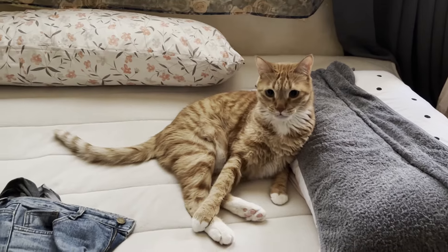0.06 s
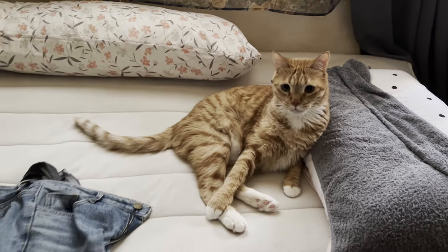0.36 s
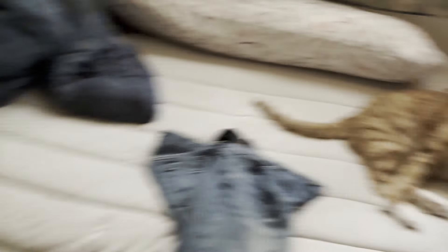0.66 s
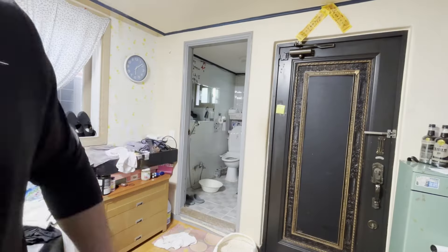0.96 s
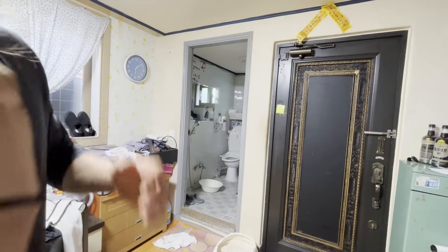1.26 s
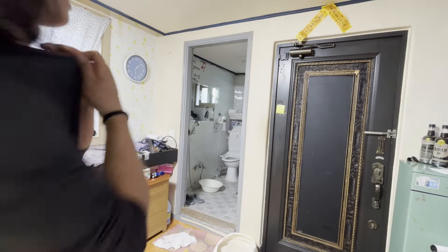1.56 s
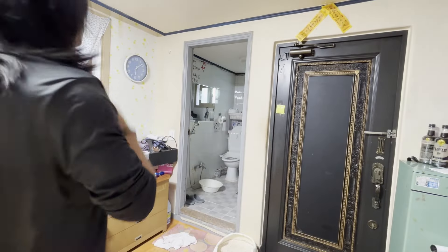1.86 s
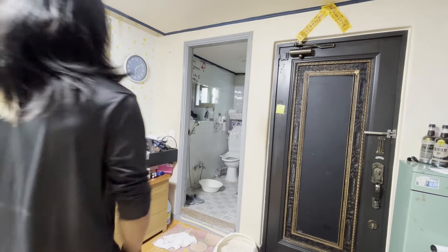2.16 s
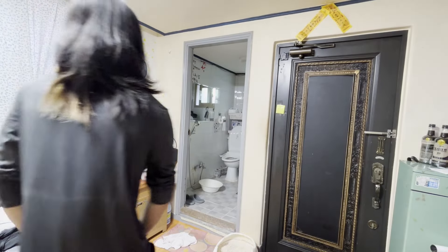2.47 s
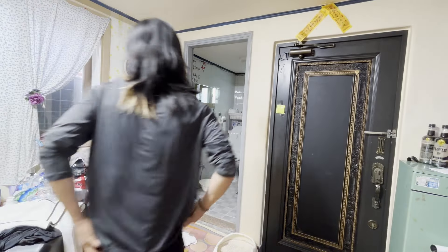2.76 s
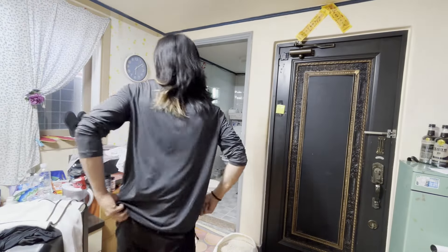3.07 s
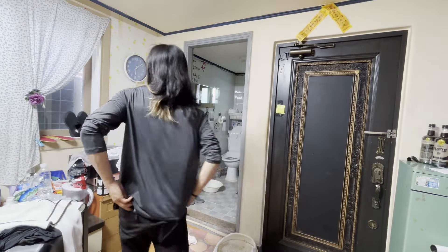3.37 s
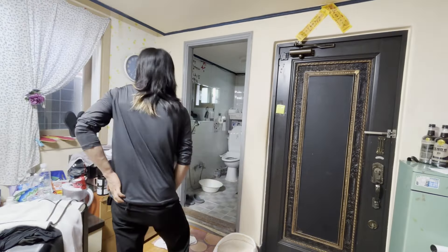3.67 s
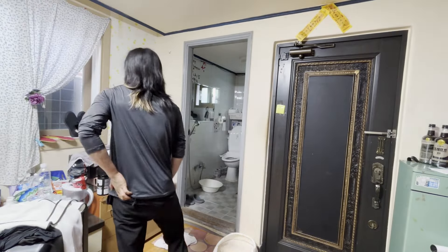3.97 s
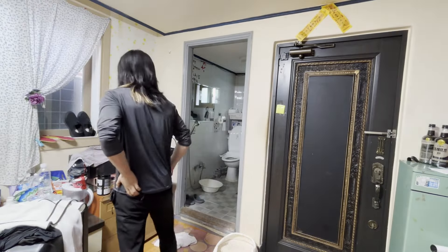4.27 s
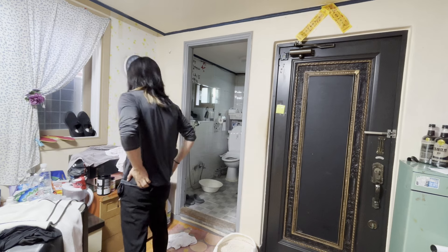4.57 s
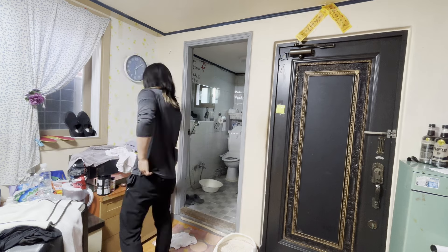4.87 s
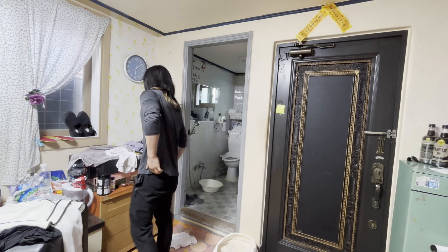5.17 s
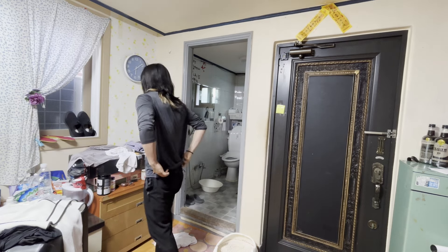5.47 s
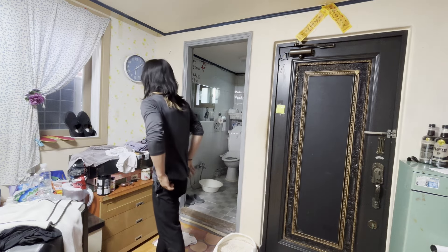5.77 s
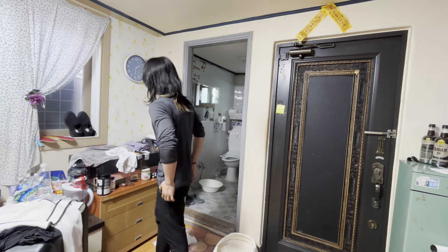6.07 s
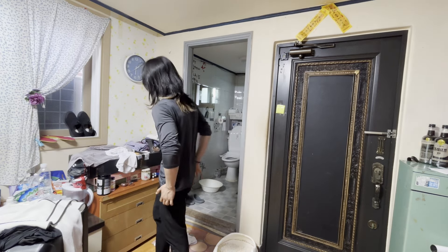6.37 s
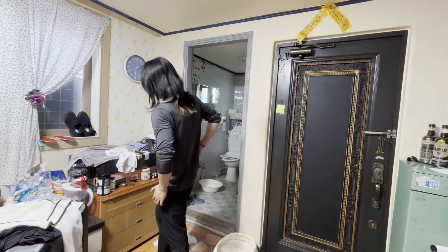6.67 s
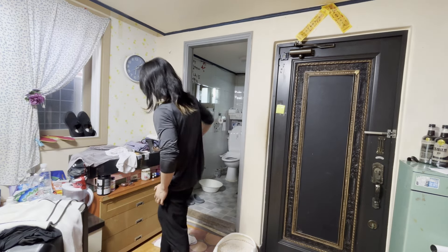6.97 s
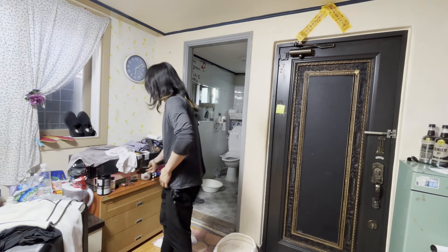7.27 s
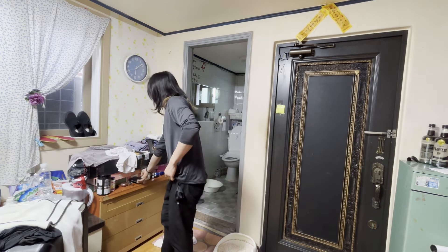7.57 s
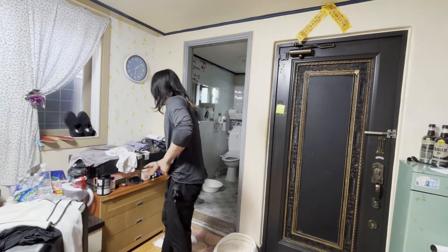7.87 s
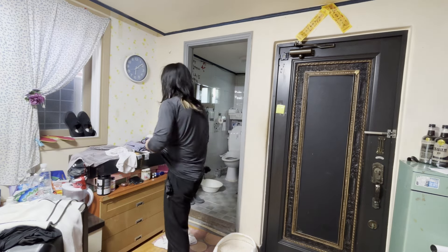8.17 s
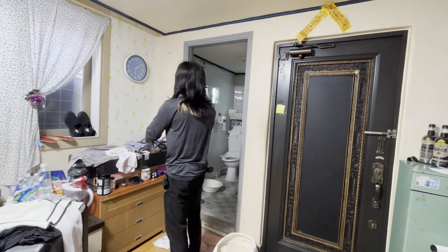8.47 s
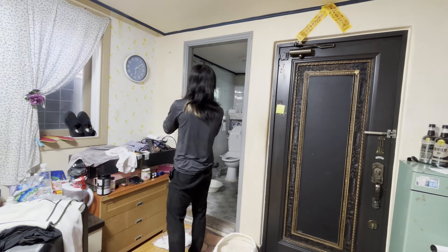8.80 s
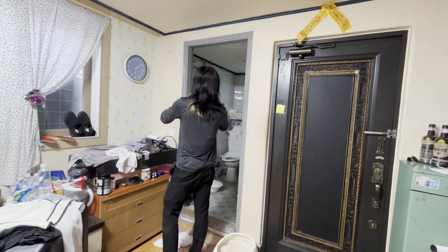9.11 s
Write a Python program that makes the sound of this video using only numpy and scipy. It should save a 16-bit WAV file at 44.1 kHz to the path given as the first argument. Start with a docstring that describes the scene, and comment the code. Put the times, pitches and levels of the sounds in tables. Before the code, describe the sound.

Sheets rustle briefly, followed by a small knock and a sharp, close click. Soft, dull footsteps cross a quiet small room as hands pat and pull at clothing and keys jingle lightly. About halfway through, objects land on a wooden dresser with a loud clatter, a hollow boom and bright ringing keys. The fabric keeps swishing, another thump and jingle come from the dresser, and lighter knocks trail off over a faint hum.

```python
"""Bedding rustles over faint room air and hum as someone leaves a bed; a knock, finger taps on a case.
Soft steps cross the small room while hands pat and tug a loose shirt and hitch up trousers:
cloth rubs, hisses and crackles. Keys at the belt jingle in thin metal partials, and small objects
clatter onto a wooden dresser, whose top and drawers ring while its hollow body booms."""
import sys
import numpy as np
from scipy import signal
from scipy.io import wavfile

SR = 44100
rng = np.random.default_rng(int(sys.argv[2]) if len(sys.argv) > 2 else 0)


def inscribe(sig):
    """Save sig as 16-bit PCM at rate SR to the path in sys.argv[1].

    A 1-D sig is mono; a 2-D sig holds one channel per row.
    Samples are clipped to [-1, 1] before scaling.
    """
    pcm = np.round(np.clip(np.atleast_2d(sig).T, -1, 1) * 32767)
    wavfile.write(sys.argv[1], SR, pcm.astype(np.int16))


N = 403074
TIME_S = np.arange(N) / SR
EDGES_HZ = np.geomspace(25, 16000, 25)
CENTRES_HZ = np.sqrt(EDGES_HZ[1:] * EDGES_HZ[:-1])


def from_db(db):
    """Decibels to gain."""
    return 10 ** (np.asarray(db) / 20)


def rms_one(x):
    """Scale to unit power."""
    return x / np.sqrt(np.mean(np.abs(x) ** 2) + 1e-20)


def in_time(points):
    """Read a time curve at every sample."""
    return np.interp(TIME_S, *np.transpose(points))


def at_hz(points, hz):
    """Read a curve on a log-frequency axis."""
    knots_hz, values = np.transpose(points)
    return np.interp(np.log(hz), np.log(knots_hz), values)


def butter(x, order, hz, kind):
    """Butterworth filter."""
    return signal.sosfilt(signal.butter(order, hz, kind, fs=SR, output="sos"), x)


def pan(left_right_db):
    """Constant-power left and right gains."""
    return rms_one(from_db([[left_right_db / 2], [-left_right_db / 2]]))


def drift(rate_hz):
    """Smooth random wander of unit power."""
    hop, warmup = 40, 2000
    pole = np.exp(-2 * np.pi * hop * rate_hz / SR)
    white = rng.standard_normal(N // hop + warmup + 2)
    slow = signal.lfilter([1], [1, -2 * pole, pole * pole], white)[warmup:]
    return np.interp(np.arange(N) / hop, np.arange(len(slow)), rms_one(slow))


def burst(onset_s, contact_s, t60_s):
    """Span and envelope of a blow: builds during contact, then decays."""
    start = int(onset_s * SR)
    t = TIME_S[:min(int((t60_s + contact_s) * SR), N - start)]
    attack = np.minimum(t / contact_s, 1) ** 2
    decay = from_db(-60 * np.maximum(t - contact_s, 0) / t60_s)
    return slice(start, start + len(t)), attack * decay


# Stereo balance: (frequency [Hz], left-right [dB])
BALANCE = [(60, -2.5), (200, -1), (380, 1), (700, 1), (1300, 3.5), (2400, 3.5), (4400, 6), (8100, 1.5),
           (15000, -3)]

def noise_bands(coherence):
    """Unit-power stereo noise bands with the given likeness between the ears."""
    white, bands = rng.standard_normal((2, 2, N)), []
    for k, hz in enumerate(CENTRES_HZ):
        mid, side = butter(white[k % 2], 2, EDGES_HZ[k:k + 2], "band")
        alike = at_hz(coherence, hz)
        mid, side = np.sqrt(1 + alike) * mid, np.sqrt(1 - alike) * side
        stereo = rms_one(np.array([mid + side, mid - side]))
        bands.append((stereo * pan(at_hz(BALANCE, hz))).astype(np.float32))
    return np.array(bands)


def mix(bands, gains):
    """Weighted sum of bands."""
    return np.einsum("b,bcn->cn", gains.astype(np.float32), bands)


def coloured(bands, spectrum):
    """Unit-power noise shaped by (frequency [Hz], density [dB])."""
    return rms_one(mix(bands, from_db(at_hz(spectrum, CENTRES_HZ)) * np.sqrt(CENTRES_HZ)))


def patchy(bands, spectrum, spread_db, rate_hz):
    """Unit-power noise of shifting colour: bands swell and fade in pairs."""
    gains = from_db(at_hz(spectrum, CENTRES_HZ)) * np.sqrt(CENTRES_HZ)
    pairs = (mix(bands[k:k + 2], gains[k:k + 2]) for k in range(0, len(bands), 2))
    return rms_one(sum(pair * from_db(spread_db * drift(rate_hz)) for pair in pairs))


# Room air: (frequency [Hz], density [dB])
AIR_SPECTRUM = [(15, -31), (25, 4), (150, 2), (373, -4.5), (529, -13), (604, 1), (790, -15), (1350, -14),
                (3830, -31), (8780, -22.5), (11200, -32.5), (13100, -20.5), (15000, -39.5)]
# Air, hum and whine: (time [s], level [dB])
AIR_LEVEL = [(0, -77.5), (.25, -75), (.45, -73.5), (.95, -65.5), (1.05, -66), (5, -63), (7.1, -64.5),
             (9.14, -62.5)]
HUM_LEVEL = [(0, -93), (1.15, -77), (1.35, -66.5), (2.1, -71), (2.45, -76), (9.14, -85)]
WHINE_LEVEL = [(0, -88), (.92, -84), (.97, -110)]

def room_tone(bands, hum_hz=61, whine_hz=3750):
    """Still air, a low hum and, for the first second, a faint whine."""
    hum = from_db(in_time(HUM_LEVEL)) * np.sqrt(2) * np.sin(2 * np.pi * hum_hz * TIME_S)
    whine = from_db(in_time(WHINE_LEVEL)) * np.sqrt(2) * np.sin(2 * np.pi * whine_hz * TIME_S)
    air = from_db(in_time(AIR_LEVEL)) * coloured(bands, AIR_SPECTRUM)
    return air + hum + whine * drift(50)


# Brushed bedding: (time [s], level [dB])
BEDDING_LEVEL = [(0, -82), (.37, -73.5), (.46, -65), (.55, -63.5), (.62, -67.5), (.94, -69), (.98, -74)]
# Colour of the brushing noise as heard, with a deep gap near 7.5 kHz: (frequency [Hz], density [dB])
BRUSH_SPECTRUM = [(180, -32.5), (300, -10.5), (1110, -9), (1350, -6.5), (2830, -5), (5130, -9),
                  (7500, -33.5), (10600, -16.5), (15500, -15.5)]

def bedding(bands, grain_db=2.0):
    """A soft, grainy brush over the sheets."""
    return from_db(in_time(BEDDING_LEVEL) + grain_db * drift(300)) * coloured(bands, BRUSH_SPECTRUM)


def bed_knock(bands, onset_s=0.7065, level_db=-55):
    """A small hollow knock some way off."""
    hollow = coloured(bands, [(300, -13), (950, 3), (1400, -3), (2500, -37), (8000, -25)])
    span, envelope = burst(onset_s, contact_s=0.001, t60_s=0.18)
    out = np.zeros((2, N))
    out[:, span] = from_db(level_db) * envelope * hollow[:, span]
    return out


# Fingers on a small case: (time [s], level [dB])
TAPS = [(0.709, -56), (0.846, -37), (0.8546, -24.5), (0.8578, -40)]
# Case modes: (frequency [Hz])
CASE_HZ = [700, 1050, 1600, 3300]
# Per mode: (level [dB], t60 [s])
CASE_MODES = [(-18, 0.021), (-5, 0.0073), (-9, 0.0064), (-29, .003)]

def case_taps(bands, right_lag_s=0.0001, left_right_db=2, nail_db=-23):
    """A nail snaps on the case; its modes ring a few cycles, reaching the left first."""
    out, t = np.zeros((2, N)), TIME_S[:SR // 20]
    ring = sum(from_db(db - 60 * t / t60_s) * np.sin(2 * np.pi * hz * t)
               for hz, (db, t60_s) in zip(CASE_HZ, CASE_MODES))
    ring = butter(ring, 3, 500, "high")   # too small a body for bass
    nail = coloured(bands, [(2000, -7), (4300, 0), (7000, -37)])
    for onset_s, db in TAPS:
        span, envelope = burst(onset_s, contact_s=0.00061, t60_s=0.0091)
        out[:, span] += from_db(db + nail_db) * envelope * nail[:, span]
        for ear, gain in enumerate(pan(left_right_db)):
            start = int((onset_s + ear * right_lag_s) * SR)
            out[ear, start:start + len(t)] += gain * from_db(db) * ring
    return out


# Footfalls: (time [s], boom [dB], thump [dB])
STEPS = [(0.86, -53, -73), (1.047, -47, -51), (3.001, -53.5, -69), (3.33, -55, -56), (4.488, -49.5, -57.5),
         (5.495, -49, -97), (6.15, -46, -74), (7.36, -71, -49.5), (7.602, -61.5, -68), (7.795, -58, -62)]

def footsteps(bands, gain_db=-1, sole_lag_s=0.069, sole_db=-8.5):
    """Soft weight on the floor, heel then sole: a boom with a dull thump above it."""
    boom = coloured(bands, [(25, -17), (42, 23), (85, 7.5), (140, -30.5), (400, -71), (2000, -80)])
    thump = coloured(bands, [(60, -9), (130, 0), (270, -0.5), (450, -17.5), (2000, -30), (8000, -80)])
    out = np.zeros((2, N))
    for onset_s, boom_db, thump_db in STEPS:
        for lag_s, part_db in [(0, 0), (sole_lag_s, sole_db)]:
            span, envelope = burst(onset_s + lag_s, contact_s=0.0081, t60_s=0.26)
            floor = from_db(boom_db) * boom[:, span] + from_db(thump_db) * thump[:, span]
            out[:, span] += from_db(part_db) * envelope * floor
    return from_db(gain_db) * out


# Cloth on cloth: (peak time [s], rub [dB], hiss lift [dB], rise [s], fall [s])
STROKES = [(1.2, -68, 5, 0.17, 0.22), (1.4, -64, 1.5, 0.027, 0.48), (1.765, -59, 9, 0.12, 0.1),
           (1.86, -62, 2.5, 0.089, 0.21), (2.331, -49, 1, 0.051, 0.063), (2.58, -50, 3, 0.16, 0.25),
           (2.689, -45, 4, 0.081, .09), (2.859, -50.5, 3.5, 0.09, 0.15), (3.39, -53, 2, 0.35, 0.077),
           (3.584, -49.5, 4.5, 0.3, 0.14), (3.869, -52, 0.5, 0.045, 0.055), (4.3, -56, 2, 0.65, 0.63),
           (4.788, -61.5, 5, .11, 0.24), (5.52, -57.5, 1, 0.45, 0.13), (5.81, -54, 0, 0.17, 0.2),
           (6.02, -63.5, 1, 0.13, 0.26), (6.5, -57, 1.5, 0.18, 0.34), (6.76, -60, -0.5, 0.18, 0.14),
           (7.3, -66.5, 6.5, .11, 0.36), (8.115, -56.5, 4.5, 0.21, 0.23), (8.42, -64.5, 2.5, 0.21, 0.33),
           (8.95, -66.5, 4, 0.9, 0.45)]

def stroke_swells(edge_db=-13, roundness=1.44):
    """Rub and hiss envelopes: each stroke swells and fades with hand speed."""
    rub_power, hiss_power = np.zeros((2, N))
    for peak_s, db, hiss_db, rise_s, fall_s in STROKES:
        span = slice(max(int((peak_s - 3 * rise_s) * SR), 0), int((peak_s + 3 * fall_s) * SR))
        t = TIME_S[span] - peak_s
        away = np.maximum(-t / rise_s, t / fall_s)
        power = from_db(db + edge_db * away ** roundness) ** 2
        rub_power[span] += power
        hiss_power[span] += power * from_db(hiss_db) ** 2
    return np.sqrt(rub_power), np.sqrt(hiss_power)


def thread_crackle(snaps_per_s=790, spread_db=4.5, level_db=-15):
    """Threads snap free: tiny bright clicks of uneven size, different in each ear."""
    sizes = from_db(spread_db * np.minimum(rng.exponential(1, (2, N)), 4))
    signs = rng.choice([-1, 1], (2, N))
    snaps = sizes * signs * (rng.random((2, N)) < snaps_per_s / SR) + 1e-18
    return from_db(level_db) * rms_one(butter(snaps, 2, [11500, 14300], "band"))


# Sliding fabric: (frequency [Hz], density [dB])
RUB_SPECTRUM = [(88, -29), (150, -4), (192, -17.5), (227, -1.5), (398, -2), (509, -8.5), (626, 2),
                (813, 0.5), (1570, 1), (4000, -7.5), (5200, -32.5), (8800, -120)]
HISS_SPECTRUM = [(1650, -36), (2800, -10), (3500, -9.5), (4460, 4), (7410, 0.5), (9660, 7.5), (11000, -7.5),
                 (13000, -11), (14500, -14), (15500, -31)]

def cloth_strokes(bands, fold_db=1.23, grain_db=1.0, hiss_db=-5):
    """Fabric slides in uneven folds of shifting colour; catching threads roughen the hiss."""
    rub_swell, hiss_swell = stroke_swells()
    folds_db = fold_db * drift(17)
    rub = patchy(bands, RUB_SPECTRUM, spread_db=1.7, rate_hz=12)
    rub *= from_db(folds_db + grain_db * drift(120))
    hiss = from_db(folds_db + hiss_db + grain_db * drift(500)) * coloured(bands, HISS_SPECTRUM)
    return rub_swell * rub + hiss_swell * (hiss + thread_crackle())


# Wall and furniture echoes: (left delay [s], right delay [s], level [dB])
ECHOES = [(.0019, .0021, -18.5), (.0043, .0038, -14), (.0071, .0076, -14)]

def near_walls(dry):
    """Early echoes colour the sound at about the same power."""
    out, power = dry.copy(), 1
    for *delays_s, db in ECHOES:
        power += from_db(db) ** 2
        for ear, delay_s in enumerate(delays_s):
            lag = int(delay_s * SR)
            out[ear, lag:] += from_db(db) * dry[ear, :N - lag]
    return out / np.sqrt(power)


def blows(rows, bands, tone, gain_db, t60_s, bass_hang, crack_db, crack_t60_s):
    """Each contact is a clack over a thud: a short crack, then reflections with their own bass decay."""
    clack_above_hz, thud_below_hz, firm_db = 225, 185, -29.5
    out = np.zeros((2, N))
    bass = 1 / (1 + (CENTRES_HZ / 200) ** 2)
    band_oct = np.log2(CENTRES_HZ / 1000)
    for onset_s, db, pitch_oct, slope_db_per_oct, thud_db, contact_s in rows:
        away_oct = np.hypot(band_oct - pitch_oct, 0.5) - 0.5
        clack = from_db(db - slope_db_per_oct * away_oct)
        clack /= np.hypot(1, (clack_above_hz / CENTRES_HZ) ** 3)
        thud = from_db(thud_db) / np.hypot(1, (CENTRES_HZ / thud_below_hz) ** 2)
        gains = np.hypot(clack, thud) * from_db(at_hz(tone, CENTRES_HZ) + gain_db)
        wash_t60_s = t60_s * from_db(0.09 * (db - firm_db))   # harder blows ring longer
        wash = (1 - bass, contact_s, wash_t60_s)
        bass_tail = (bass, contact_s + 0.0033, t60_s * bass_hang)
        crack = ((1 - bass) * from_db(crack_db), contact_s, crack_t60_s)
        for share, rise_s, decay_s in (wash, bass_tail, crack):
            span, envelope = burst(onset_s, rise_s, decay_s)
            out[:, span] += envelope * mix(bands[:, :, span], gains * share)
    return out


# Hands on cloth: (time [s], level [dB], pitch [oct re 1 kHz], slope [dB/oct], thud [dB], contact [s])
PATS = [(1.378, -50.5, 1.5, 25, -80, 0.0085), (1.553, -33.5, 1.42, 6, -70, 0.0038),
        (1.735, -45.5, 1, 28, -80, 0.012), (2.095, -28, 1.2, -1, -33, 0.01),
        (2.572, -40.5, 2.4, 3.5, -80, 0.0091), (3.101, -41.5, 3.5, 1.5, -68, 0.0086),
        (3.165, -41.5, 2.6, 3, -51, 0.0044), (4.49, -43.5, -0.5, 17, -75, .008),
        (4.695, -55, -9.5, 1, -90, .01), (5.605, -50.5, 2.1, 4, -84, 0.0097)]
# Their colour: (frequency [Hz], gain [dB])
PAT_TONE = [(35, -13), (70, -7), (170, -2), (300, -5.5), (700, -3), (1300, -1), (2600, -5), (4500, -6),
            (8000, -8), (10500, -14.5), (14000, -17)]

def cloth_pats(bands):
    """Hands pat and pluck the clothes: slaps whose bass dies quickly."""
    return blows(PATS, bands, PAT_TONE, gain_db=-8, t60_s=0.29, bass_hang=0.42,
                 crack_db=-13, crack_t60_s=0.064)


# Jolts of the keys: (time [s], level [dB], long-key lift [dB], brightness [dB])
JOLTS = [(3.85, -49.5, -7, -1.5), (3.966, -51, 1, -10), (4.094, -50, -7, -14), (4.208, -52.5, -6, -18),
         (4.315, -46.5, 0, -22), (4.442, -56.5, -15, -2), (4.632, -73, 5, 0), (4.89, -73.5, 1.5, -12),
         (4.966, -40.5, -5.5, 0), (5.02, -29.5, -14.5, -22), (5.066, -30, -7, -12),
         (5.145, -26.5, -6, -5.5), (5.181, -26, 1, -11), (5.22, -33.5, -5, 8), (5.25, -29.5, 4.5, 5),
         (5.319, -33.5, -1, -3), (7.43, -42, 3, 3), (7.48, -44.5, -10, -18)]

def key_touches(rebounds=2, mean_gap_s=0.024, rebound_db=-5):
    """After each jolt the keys swing back and touch ever more lightly; rows as in JOLTS."""
    gaps_s = mean_gap_s * (0.5 + rng.random((len(JOLTS), rebounds)))
    return [(onset_s + gap_s[:k].sum(), db + k * rebound_db, *colour)
            for (onset_s, db, *colour), gap_s in zip(JOLTS, gaps_s) for k in range(rebounds + 1)]


# Key partials: (frequency [Hz])
KEY_HZ = [6541, 6700, 7467, 8016, 8145, 8521, 8637, 10930, 11870, 15090]
# Per partial: (level [dB], t60 [s], left-right [dB])
KEY_MODES = [(-6, 0.35, 6), (0.5, 0.13, 10), (-16.5, 0.11, 0), (-3.5, 0.2, 19.5), (-6.5, 0.22, 12),
             (2, .27, 3.5), (-14, 0.27, 21.5), (-11.5, 0.1, -0.5), (6.5, 0.19, 1), (-6.5, .25, 0)]
# Response to a touch's brightness: (frequency [Hz], share [0-1])
BRIGHTNESS_SHARE = [(8800, 0), (10900, 1), (12000, 1), (15000, 0.35)]

def key_ring(touches, gain_db=-3.5, scatter_db=2.3, detune_hz=5, waver=0.44, shimmer=0.55):
    """Each touch rings the metal anew; the keys press on each other, so pitch and strength waver."""
    long_key_below_hz, right_lag_s = 7000, 0.000035
    out = np.zeros((2, N))
    for hz, (mode_db, t60_s, left_right_db) in zip(KEY_HZ, KEY_MODES):
        power = np.zeros(N)
        is_long = hz < long_key_below_hz
        bright_share = at_hz(BRIGHTNESS_SHARE, hz)
        for onset_s, db, long_db, bright_db in touches:
            span, envelope = burst(onset_s, contact_s=0.0063, t60_s=t60_s)
            touch_db = db + is_long * long_db + bright_share * bright_db + rng.normal(0, scatter_db)
            power[span] += (envelope * from_db(touch_db)) ** 2
        phase = 2 * np.pi * np.cumsum(hz + detune_hz * drift(25)) / SR
        for ear, gain in enumerate(pan(left_right_db)):
            ear_phase = phase - 2 * np.pi * hz * ear * right_lag_s
            partial = (1 + waver * drift(33)) * np.cos(ear_phase)
            partial += shimmer * drift(160) * np.sin(ear_phase)
            out[ear] += gain * from_db(mode_db + gain_db) * np.sqrt(power) * rms_one(partial)
    return out


def key_scratch(touches, bands, scratch_db=-53, sparkle_db=-52, light_touch_db=-48, rattle_db=2.0):
    """Metal scrapes metal, growing more slowly with force than the ring; bright touches sparkle."""
    scratch_power, sparkle_power = np.zeros((2, N))
    for onset_s, db, _, bright_db in touches:
        span, envelope = burst(onset_s, contact_s=0.00049, t60_s=0.2)
        strength = envelope * from_db(0.75 * (db - light_touch_db))
        scratch_power[span] += (strength * from_db(scratch_db)) ** 2
        sparkle_power[span] += (strength * from_db(sparkle_db + min(bright_db, 0))) ** 2
    scratch = coloured(bands, [(1500, -40.5), (4500, -6), (6800, 1.5), (8300, 4),
                               (10200, -8), (12500, -8.5), (15000, -8)])
    sparkle = coloured(bands, [(8300, -29), (10800, -5.5), (14000, 0)])[::-1]   # ears swapped
    rattle = from_db(rattle_db * drift(120))
    return rattle * (np.sqrt(scratch_power) * scratch + np.sqrt(sparkle_power) * sparkle)


# Objects on wood: (time [s], level [dB], pitch [oct re 1 kHz], slope [dB/oct], thud [dB], contact [s])
KNOCKS = [(4.966, -15, -0.75, 4, -34.5, 0.0013), (5.031, -14, 0.9, 12.5, -40, 0.0021),
          (5.062, -27.5, 2, 2.5, -49, 0.0054), (5.11, -36.5, 0.7, 0.5, -50, 0.0021),
          (5.155, -26.5, 0.1, 11, -63, 0.0067), (5.177, -32, 2, 6.5, -53, .004),
          (5.243, -33.5, 0.5, 5, -52, 0.0021), (5.31, -43, 0, 3, -61.5, 0.017),
          (6.899, -58, 0, 13, -79.5, .0015), (7.335, -45.5, 0.1, 5.5, -55, 0.0093),
          (7.428, -26.5, -1.36, 3, -40, 0.0025), (7.48, -28.5, 2, 14.5, -57, 0.00069),
          (7.754, -44.5, 3.5, 26, -71, 0.0021), (7.759, -43.5, -1.14, 5, -52, 0.003),
          (8.519, -45.5, -0.33, 9.5, -59, .002), (8.593, -36, 0.87, 11, -76, 0.0011),
          (8.75, -50.5, 0, 3.5, -73, 0.0014), (8.895, -55.5, 3.5, 2, -65, 0.0036)]
# Their colour: (frequency [Hz], gain [dB])
WOOD_TONE = [(28, -22.5), (42, -11), (60, -7), (115, 1), (160, -7.5), (215, -3.5), (400, -6), (780, -5.5),
             (1300, -1.5), (2600, -5.5), (4500, -1.5), (8000, -0.5), (10500, -5.5), (14000, -7.5)]
# Top and drawer modes: (frequency [Hz])
DRESSER_HZ = [61, 447, 605, 645, 975, 1056, 1335, 1395, 1566, 1608, 1802, 1892, 2720, 3070, 3500]
# Per mode: (width [Hz], lift [dB])
DRESSER_MODES = [(19.9, 11.5), (22, 8), (19.96, 12), (25, 6), (18, 8.5), (46, 2), (18, 9), (25, -3.5),
                 (21.8, -1), (16, 6), (22, 4), (25, 9.5), (70, 6), (45, 6.5), (348, 4)]

def dresser_clatter(bands, chatter_db=1.0):
    """Objects land, tip and rattle; top and drawers resonate but radiate little deep bass."""
    hits = blows(KNOCKS, bands, WOOD_TONE, gain_db=-7.5, t60_s=0.31, bass_hang=1.09,
                 crack_db=-16, crack_t60_s=0.017)
    hits *= from_db(chatter_db * drift(150))   # edges chatter as objects settle
    out = hits.copy()
    for hz, (width_hz, lift_db) in zip(DRESSER_HZ, DRESSER_MODES):
        resonance = signal.lfilter(*signal.iirpeak(hz, hz / width_hz, fs=SR), hits)
        out += (from_db(lift_db) - 1) * resonance
    return butter(out, 4, 52, "high")


# Heavy landings: (time [s], level [dB])
LANDINGS = [(4.968, -37), (5.035, -38), (7.432, -33), (7.78, -59)]
# Dresser body: (frequency [Hz], level [dB], t60 [s])
BODY_MODES = [(60, -1, .5), (75, -3, .36), (116.6, -4, 0.27), (222, -6, .2), (443, -3, .22)]

def dresser_boom():
    """Heavy landings rock the hollow body in a few deep modes, alike in both ears."""
    out = np.zeros(N)
    for onset_s, db in LANDINGS:
        for hz, mode_db, t60_s in BODY_MODES:
            span, envelope = burst(onset_s, contact_s=0.006, t60_s=t60_s)
            mode = np.sin(2 * np.pi * hz * (TIME_S[span] - onset_s))
            out[span] += from_db(db + mode_db) * envelope * mode
    return out


# Likeness between the ears: (frequency [Hz], coherence [-1 to 1])
ROOM_COHERENCE = [(60, 0.6), (130, 0.77), (290, .5), (640, -0.02), (1400, 0.24), (3100, 0), (15000, 0)]
NEAR_COHERENCE = [(60, 0.61), (15000, 0.3)]
DRESSER_COHERENCE = [(60, 1), (130, 0.19), (250, -0.36), (400, .15), (700, -0.057), (1400, 0.025),
                     (3000, 0.0093), (15000, -0.32)]

def scene():
    """Bedside, steps, clothes, keys and dresser over the room tone."""
    room, near = noise_bands(ROOM_COHERENCE), noise_bands(NEAR_COHERENCE)
    room_shifted, room_reversed = np.roll(room, SR, axis=2), room[:, :, ::-1]
    bedside = bedding(room_shifted) + bed_knock(near) + case_taps(near)
    touches = key_touches()
    clothes = near_walls(cloth_strokes(room) + cloth_pats(room_shifted))
    keys = key_ring(touches) + key_scratch(touches, room_shifted)
    dresser = dresser_clatter(noise_bands(DRESSER_COHERENCE)) + dresser_boom()
    return room_tone(room_reversed) + bedside + footsteps(near) + clothes + keys + dresser


def record(dry, cutoff_hz=15700):
    """Steep treble cut."""
    return signal.sosfilt(signal.ellip(12, 0.1, 80, cutoff_hz, fs=SR, output="sos"), dry)


dry = scene()
out = record(dry)
inscribe(out)
```